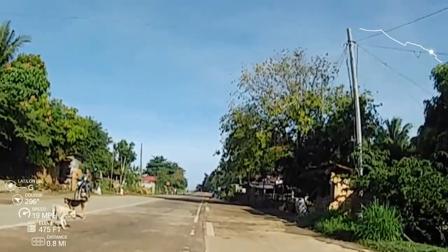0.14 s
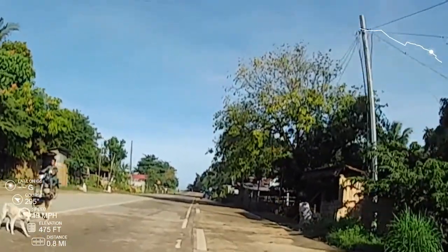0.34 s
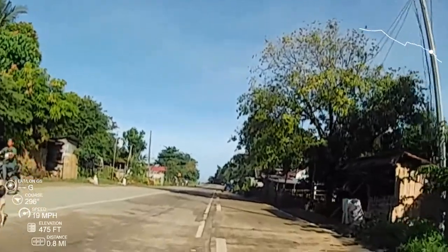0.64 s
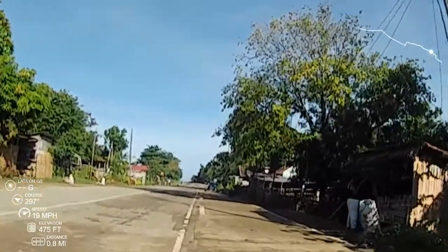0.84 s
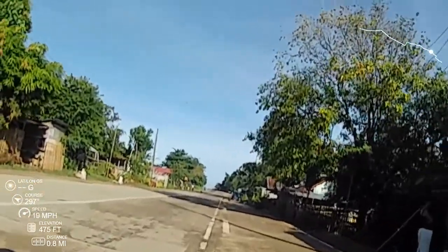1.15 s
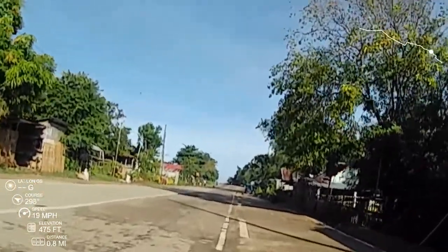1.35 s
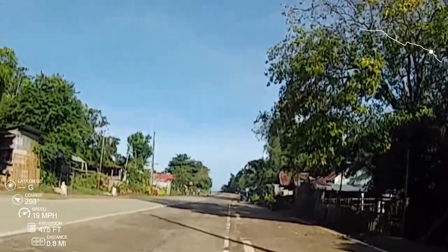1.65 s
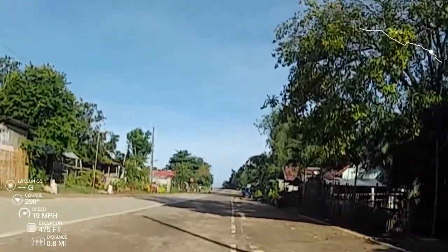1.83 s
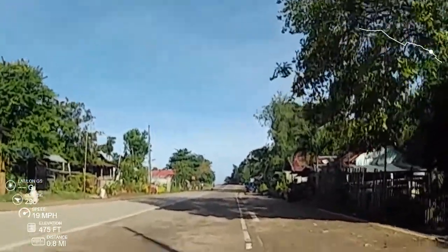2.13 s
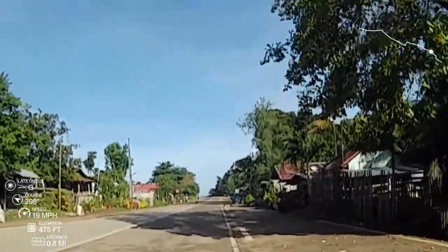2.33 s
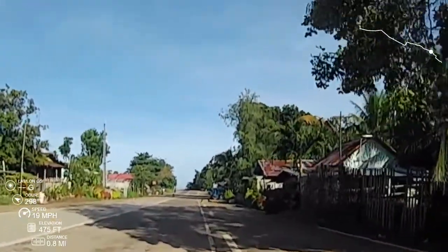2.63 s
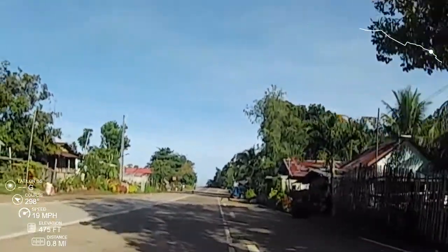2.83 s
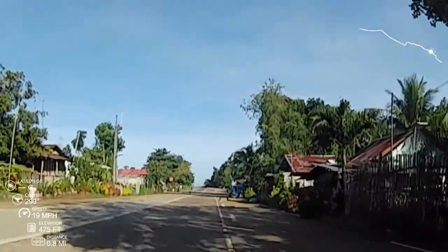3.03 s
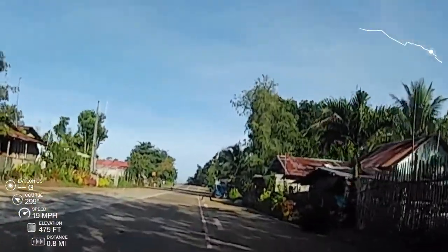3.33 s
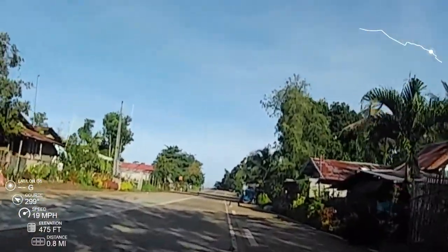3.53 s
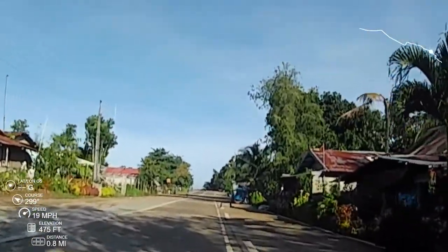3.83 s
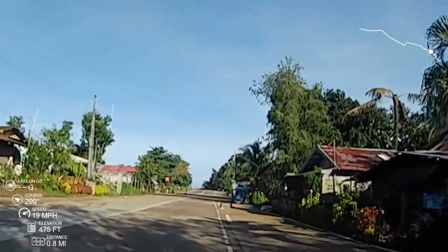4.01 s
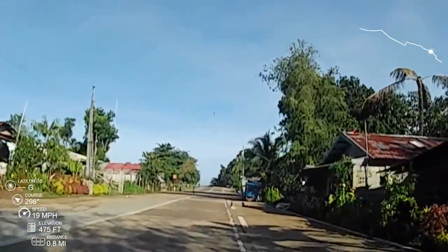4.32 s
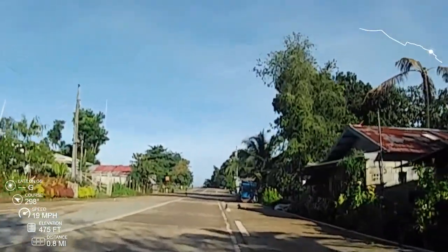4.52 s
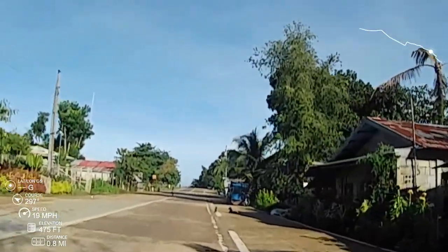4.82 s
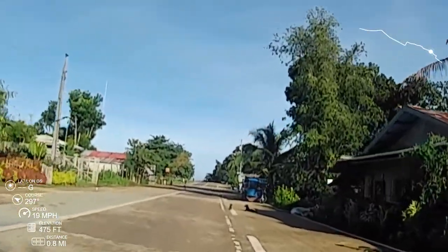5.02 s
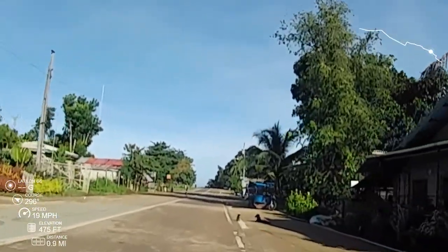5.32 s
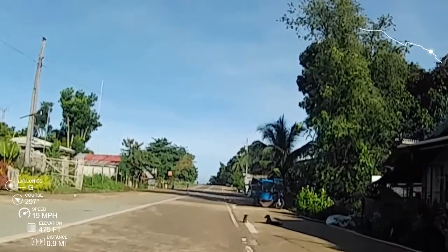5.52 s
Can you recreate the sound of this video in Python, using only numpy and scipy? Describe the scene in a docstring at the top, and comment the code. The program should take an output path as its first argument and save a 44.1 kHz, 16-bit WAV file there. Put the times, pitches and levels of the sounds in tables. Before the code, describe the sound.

A bicycle rolls along a paved country road, heard from a microphone close to the handlebar bell. The bell is still ringing faintly when it is struck once with a shrill clang that briefly distorts, then rings on with a fast shimmer for several seconds. Wind thumps, hisses and whistles unsteadily on the microphone, growing gustier later, while the tyres rush softly and flick up a little grit.

```python
"""Bicycle bell on a country road

A paved country road, heard from a camera microphone riding on the bicycle, close to the bell.
Air buffets the microphone, hisses and whistles unsteadily over the housing; the tyres rush and flick
a little grit. The bell, still ringing from an earlier ding, is struck again: a shrill clang overloads
the microphone, then the dome rings out, beating."""
import sys
import numpy as np
from scipy import signal
from scipy.fft import rfft, irfft
from scipy.io import wavfile

SR = 44100
rng = np.random.default_rng(int(sys.argv[2]) if len(sys.argv) > 2 else 0)


def int16_out(signal):
    """Quantize to a 16-bit WAV file."""
    q = np.round(np.clip(np.atleast_2d(signal).T, -1, 1) * 32767)
    wavfile.write(sys.argv[1], SR, q.astype(np.int16))


N = 249606
TIME = np.arange(N) / SR
BIN_HZ = np.arange(N // 2 + 1) * SR / N


def from_db(db):
    """Decibels to gain."""
    return 10 ** (np.asarray(db) / 20)


def unit_rms(x):
    """Scale to unit rms."""
    return x / np.sqrt(np.mean(x ** 2) + 1e-20)


def curves(rows):
    """Join rows (t/s, values..) with straight lines, one curve for each column of values."""
    times, *columns = np.transpose(rows)
    return [np.interp(TIME, times, column) for column in columns]


def swells(rows):
    """Each row (t/s, length/s, heights..) is a smooth hump; one sum for each column of heights."""
    return sum(np.outer(heights, .5 ** np.minimum((2 * (TIME - centre) / length) ** 2, 20))
               for centre, length, *heights in rows)


def drift(rate_hz):
    """Random wander of unit rms, mostly slower than rate_hz."""
    return unit_rms(irfft(rfft(rng.standard_normal(N)) / (1 + (BIN_HZ / rate_hz) ** 2), N))


def flicker(rate_hz):
    """Random wander of unit rms without extreme peaks."""
    return unit_rms(np.tanh(drift(rate_hz) / 1.5))


def noise(colour):
    """Noise of unit rms with the spectrum (f/Hz, level/dB), rolled off beyond both ends."""
    hz, level_db = np.transpose(colour)
    bins = np.maximum(BIN_HZ, 1)
    gain = from_db(np.interp(np.log(bins), np.log(hz), level_db))
    roll_off = 1 / (1 + (bins / hz[-1]) ** 8) / (1 + (hz[0] / bins) ** 4)
    return unit_rms(irfft(rfft(rng.standard_normal(N)) * gain * roll_off, N))


def patchy_noise(colour, depth_db):
    """Coloured noise of unit rms whose treble bands each flicker on their own."""
    centres_hz = np.geomspace(1500, 9500, num=9)
    spectrum, out = rfft(noise(colour)), 0
    for share in np.eye(len(centres_hz)):
        band = irfft(spectrum * np.interp(BIN_HZ, centres_hz, share), N)
        out = out + band * from_db(depth_db * flicker(24))
    return unit_rms(out)


# thumb strikes: t/s, level/dB, change of the lowest tone with the striking point/dB
BELL_STRIKES = [(-.85, -2, -4.5), (.7528, 0, 0)]
# ringing tones of the bell, the lowest two a beating pair; 12327 Hz is distortion from the microphone:
# f/Hz, level/dB, t60/s, boost during the clang/dB
BELL_TONES = [(3196, -20.6, 9.2, 6.8), (3241, -17, 9.7, 3.2), (4526, -42, 2.6, 25), (6391, -60.5, 3.8, 0),
              (7095, -68, 9, 0), (7144, -65, 8, 44), (8005, -80, .6, 58), (8425.5, -16.3, 3.05, 20.3),
              (11016, -86, 6, 63), (12327, -45.5, 2.9, 15), (14940, -69, 5.5, 0), (15210, -76, 4, 0)]
# the clang throbs as the low pair beats, and ends with a click:
# t/s, length/s, boost of the lower tones/dB, boost of the rasp/dB
CLANG_THROBS = [(.7905, 0.0091, 6.5, 3), (.814, 0.0089, -1, 2.5), (.874, .003, 0.5, -0.5)]
# spectrum of the click and the clang's harsh rasp: f/Hz, level/dB
RASP_COLOUR = [(40, -12), (300, -14), (1500, -18.5), (3500, -9.5), (6000, -6.5), (8300, 4), (10500, -1.5),
               (13000, -28.5), (16000, -29.5)]


def bell(clang_s=.1222, first_beat_s=.0152, shimmer_db=.8, shake_rad=.04, lower_tones_hz=5000):
    """On the handlebar, close by: each strike clicks and clangs, then the trembling dome rings freely."""
    out = np.zeros(N)
    rasp_noise = noise(RASP_COLOUR)
    throb_db, rasp_boost_db = swells(CLANG_THROBS)
    # the higher the tone, the more its strength and phase tremble
    trembles = [hz / BELL_TONES[-1][0] * np.array([shimmer_db * drift(16), shake_rad * drift(70)])
                for hz, *_ in BELL_TONES]
    for start, strength_db, lowest_db in BELL_STRIKES:
        age = np.maximum(TIME - start, 0)
        clang = np.clip((clang_s - age) / .001, 0, 1)
        # the ring falls faster while it is loudest, and again as it dies out
        fade_db = 2.5 * np.exp(-age) - 5 * np.maximum(age - 3.6, 0)
        ring = 0
        for k, (hz, db, t60, boost_db) in enumerate(BELL_TONES):
            tremble_db, tremble_rad = trembles[k]
            free_db = db + lowest_db * (k == 0) + fade_db + tremble_db - 60 * age / t60
            clang_db = clang * (boost_db + throb_db * (hz < lower_tones_hz))
            phase = 2 * np.pi * hz * (age - first_beat_s) + tremble_rad
            ring = ring + np.sqrt(2) * np.sin(phase) * from_db(free_db + clang_db)
        rasp = clang * from_db(-4.5 + rasp_boost_db)
        click = from_db(9) * np.exp(-age / .0015)
        out += from_db(strength_db) * (age > 0) * (ring + (rasp + click) * rasp_noise)
    return out


# eddies that hit the microphone squarely: t/s, length/s, boost of the thumps/dB, boost of the rumble/dB
EDDY_BLOWS = [(.38, 0.19, 4, 6), (.6, 0.086, 4.5, 3), (.9, 0.043, 8, 0), (1.05, 0.21, 1, 8),
              (1.24, 0.13, 4.5, 5.5), (1.425, 0.059, 11, -0.5), (2.06, 0.055, 7, 0.5), (3.27, 0.15, -1, 6),
              (3.39, 0.22, 6, 1.5), (4.08, 0.058, 5.5, -0.5), (4.48, 0.071, 4.5, 2.5),
              (4.88, 0.088, 4, 4.5), (5.16, 0.059, 6.5, 1.5)]
# spectra of the deep thumps and of the rumble above them: f/Hz, level/dB
THUMP_COLOUR = [(8, -18), (20, 2.5), (32, 0.5), (60, -3), (100, -9), (170, -26), (400, -60.5)]
RUMBLE_COLOUR = [(50, -11.5), (115, 0), (180, -2.5), (300, -6.5), (450, -12.5), (900, -32)]


def buffeting(flow_db, eddies):
    """Turbulent air thumps and rumbles right on the microphone, harder at each blow."""
    thump_boost_db, rumble_boost_db = swells(EDDY_BLOWS)
    thumps = unit_rms(np.tanh(noise(THUMP_COLOUR) / 2))   # the pressure of a gust is bounded
    thump_db = -24 + thump_boost_db + .16 * flow_db + 1.3 * drift(8)
    rumble_db = -25.5 + rumble_boost_db + .69 * flow_db + .52 * eddies
    return from_db(thump_db) * thumps + from_db(rumble_db) * noise(RUMBLE_COLOUR)


# spectra of the air's rush in the port and of its hiss: f/Hz, level/dB
RUSH_COLOUR = [(250, -7.5), (450, -6.5), (600, 0), (780, -8.5), (1000, -8), (1700, -14), (4000, -61)]
HISS_COLOUR = [(2000, -25.5), (3300, -1.5), (4000, 3.5), (4700, -3), (5300, -8), (6200, -25), (9000, -32),
               (10500, -44), (16000, -62)]


def wind(flow_db, treble_db, gust_db, eddies):
    """The air rushes in the microphone's port and hisses, swelling with each gust and eddy."""
    puffs = .5 * eddies + .57 * flicker(76)   # small eddies ride on the large ones
    rush_db = -29 + .92 * flow_db + .31 * gust_db + 5.5 * puffs
    hiss_db = -43 + 1.23 * treble_db + .99 * gust_db + 1.2 * eddies + 3 * flicker(57)
    rush = from_db(rush_db) * noise(RUSH_COLOUR)
    return rush + from_db(hiss_db) * patchy_noise(HISS_COLOUR, depth_db=2.5)


def whistle(flow_db, gust_db, gust_speed, eddies, cruise_hz=1077.6, chirps_per_s=32,
            unrest=.6, width_hz=55, blur_hz=190):
    """Vortices shed from the housing chirp at a pitch that follows the air speed, purer in gusts."""
    speed = 1 + gust_speed
    purity = np.clip(.62 + 2.2 * gust_db, .02, .92)
    unsteady = from_db(-np.maximum(gust_db, 0))   # a strong gust overrides the eddies
    # each chirp is an arch, rising and falling in pitch and strength together
    chirp_rate = chirps_per_s * np.exp(.35 * flicker(20.09))
    arches = np.abs(np.sin(np.pi * np.cumsum(chirp_rate) / SR))
    arches = unit_rms(arches - arches.mean())
    pitch_hz = cruise_hz * speed * (1 + unsteady * (.035 * eddies + .05 * arches))
    phase = 2 * np.pi * np.cumsum(pitch_hz) / SR
    # regular shedding gives a tone shaken in strength and phase, reedier in the fastest air
    shaken = phase + unrest * drift(width_hz)
    reediness = purity * (speed / speed.max()) ** 2
    overtones = from_db(-15) * np.sin(2 * shaken) + from_db(-20) * np.sin(3 * shaken)
    tone = np.sin(shaken) + reediness * overtones
    tone = unit_rms(tone * (1 + unrest * unsteady * flicker(width_hz)))
    # irregular shedding blurs it into a band of noise
    blur = unit_rms(drift(blur_hz) * np.sin(phase) + drift(blur_hz) * np.cos(phase))
    level_db = -25 + .95 * flow_db + gust_db + 2 * unsteady * arches
    return from_db(level_db) * (np.sqrt(purity) * tone + np.sqrt(1 - purity) * blur)


# flares of the road rush, and brief dips (negative) where the air lulls: t/s, length/s, boost/dB
ROAD_FLARES = [(.49, 0.081, 5), (2.33, 0.065, 6), (2.591, 0.0056, 14.5), (2.715, 0.023, 8.5),
               (3.21, 0.066, -9.5), (3.78, 0.021, 8), (3.832, 0.0077, 15), (4.203, .016, -1),
               (4.23, 0.039, 7), (5.16, 0.055, 5.5), (5.237, .012, -3.5)]
# spectrum of the tread on the road: f/Hz, level/dB
TYRE_COLOUR = [(500, -21.5), (1000, 1), (1500, 2), (2000, -2), (2650, -3.5), (3200, -10.5), (4200, -32.5),
               (7000, -55.5)]


def tyres(treble_db):
    """Below the microphone, tread on coarse paving: a grainy rush that briefly flares and dips."""
    flare_db, = swells(ROAD_FLARES)
    grain_db = 1.5 * flicker(98) + flicker(9)
    return from_db(-33 + treble_db + flare_db + grain_db) * patchy_noise(TYRE_COLOUR, depth_db=2.1)


# grit hitting the frame: t/s, level/dB, f/Hz, overtone relative to the ring/dB
GRIT_HITS = [(.208, -57, 9600, -21), (2.153, -54, 9250, -25), (2.447, -48, 6200, -30),
             (4.423, -46, 8700, -1), (4.4385, -38, 8750, -2), (4.4503, -47, 8750, -4),
             (4.850, -53, 8300, -22), (4.8588, -47, 7400, -24), (4.8685, -41, 7250, -25),
             (4.869, -49, 8700, -14), (4.8765, -49, 8450, -20), (4.889, -48, 7600, -25)]


def grit(tick_s=.0037, ring_s=.006, overtone_ratio=1.72):
    """Small stones chink on the frame: a narrow-band tick and a short metallic ring with an overtone."""
    out, white = np.zeros(N), rng.standard_normal(N)
    for start, db, hz, overtone_db in GRIT_HITS:
        age = np.maximum(TIME - start, 0)
        band = signal.butter(2, [hz * .95, hz * 1.05], "band", fs=SR, output="sos")
        tick = unit_rms(signal.sosfilt(band, white)) * np.exp(-age / tick_s)
        phase = 2 * np.pi * hz * age
        ring = np.sin(phase) + from_db(overtone_db) * np.sin(overtone_ratio * phase)
        attack = np.minimum(age / .0005, 1)
        out += from_db(db) * attack * (tick + from_db(-9) * ring * np.exp(-age / ring_s))
    return out


# sudden slaps of air on the microphone: t/s, level/dB, f/Hz
AIR_SLAPS = [(3.332, -15, 1107), (4.2123, -12.5, 1210), (4.2918, -15.5, 1110), (5.066, -18, 1005),
             (5.2432, -13.5, 1067), (5.272, -15, 1144), (5.486, -13.5, 1344)]


def slaps(rise_s=.0033):
    """Each slap of air sets the microphone's port ringing for a few cycles, with a breathy edge."""
    out, breath = np.zeros(N), .14 * noise(TYRE_COLOUR)
    for start, db, hz in AIR_SLAPS:
        age = np.maximum(TIME - start, 0)
        envelope = age / rise_s * np.exp(1 - age / rise_s)
        out += from_db(db) * envelope * (np.sin(2 * np.pi * hz * age) + breath)
    return out


# air stream and treble (hiss and tyres) relative to cruising; both sink after the clang and creep back:
# t/s, air level/dB, treble level/dB
AIR_FLOW = [(0.0, -4.5, -7.5), (0.2, -4.5, -7), (0.55, -1.5, -3), (0.74, -3, -3.5), (0.95, -16.5, -12.5),
            (1.25, -16.5, -16.5), (1.55, -9.5, -10), (1.9, -5.5, -5), (2.45, -5, -3.5), (2.62, -2.5, -2.5),
            (2.88, -4.5, -8), (3.03, 0.5, -0.5), (3.62, -2.5, -3), (3.85, 3, 1.5), (4.35, 0, -1),
            (5.05, 0.5, -2.5), (5.25, 0.5, 0.5), (5.66, 0.5, 1)]
# gusts over the housing, and lulls (negative): t/s, length/s, change of air speed/fraction, swell/dB
AIR_GUSTS = [(.03, 0.0291, -.05, 2.5), (.068, .028, .17, 4), (.125, .05, -.18, -0.5), (.2, 0.0306, .13, 7),
             (.232, 0.0249, .08, 10), (.29, .06, -.1, -13), (.357, .03, .25, 5.5), (.45, 0.0205, .12, 1.5),
             (.492, .04, .23, 6), (.55, .025, 0.2, 3), (.602, 0.02487, .14, 1.5), (.66, 0.02986, -.05, 4),
             (.72, 0.04056, -.09, 5), (.883, .025, 0.15, 9.5), (1.022, .022, 0.35, 10),
             (1.305, .032, .25, 8), (1.382, .025, .23, 8), (1.5, 0.0298, .07, 3.5), (1.7, .04, .12, 0),
             (1.765, .04, .18, 1.5), (1.85, .05, .11, 4), (1.98, .07, 0.16, 0), (2.04, 0.037, 0, -5.5),
             (2.07, 0.01963, .13, -1), (2.565, .035, .2, 2), (2.63, .04, .16, 2), (2.71, .06, .2, 2),
             (2.775, .025, 0.12, 2), (2.808, .025, 0, -10.5), (2.835, 0.02016, .15, 2.5),
             (3.08, 0.02027, .15, 1), (3.135, .06, .18, 2.5), (3.21, .05, -.08, -9.5),
             (3.295, .025, 0.29, 1.5), (3.32, .02, 0, -7.5), (3.36, .025, .2, 1), (3.39, .025, 0.21, 4),
             (3.437, .055, .31, 6.5), (3.49, 0.0197, .1, 5), (3.535, .03, .17, 2.5), (3.63, 0.051, 0, -1.5),
             (3.78, 0.013, -.08, 5.5), (3.995, .05, .22, 0), (4.13, .03, .12, 1.5), (4.185, .025, .12, 1.5),
             (4.205, 0.0096, 0, -7), (4.275, 0.023, -0.068, -6.5), (4.51, .04, .18, 0),
             (4.575, 0.055, .15, 3.5), (4.635, .03, -.02, -3), (4.675, .034, .3, 4), (4.702, .018, .18, 4),
             (4.758, .04, .32, 2), (4.83, 0.039, 0.25, 8), (4.88, .03, .16, -1), (4.922, .022, .18, 4.5),
             (4.955, 0.027, -.03, -7), (4.987, .02, 0, 2), (5.022, 0.029, .19, 1), (5.055, 0.017, 0, -11.5),
             (5.11, 0.0498, -.05, 1.5), (5.238, .012, 0, -7), (5.263, .016, 0, -2.5), (5.293, .008, 0, 5),
             (5.315, .025, .14, 2), (5.405, 0.027, 0.16, 2.5), (5.447, 0.043, .24, 3), (5.481, .012, 0, -6),
             (5.535, .03, 0.17, 3.5), (5.57, .035, .19, 0.5), (5.63, .04, .13, 2.5)]


def scene():
    """The ride in mono at the microphone; one air stream drives the buffeting, wind and whistle."""
    eddies = flicker(22)
    flow_db, treble_db = curves(AIR_FLOW)
    gust_speed, gust_db = swells(AIR_GUSTS)
    air = buffeting(flow_db, eddies) + wind(flow_db, treble_db, gust_db, eddies)
    air += whistle(flow_db, gust_db, gust_speed, eddies)
    return (bell() + air + slaps() + tyres(treble_db) + grit())[None]


# spectrum of the overdriven microphone's harsh fizz: f/Hz, level/dB
FIZZ_COLOUR = [(40, 5.5), (1400, -8), (1950, -0.5), (2600, -15), (4500, -5), (6000, 0), (8300, 1.5),
               (10000, 4.5), (12500, -7), (16000, -12)]


def record(dry, ceiling=.65, fizz_db=-19, release_s=.007, dull_hz=12500, cutoff_hz=15700):
    """The microphone clips at its ceiling and fizzes when driven far beyond; the top is dulled and cut."""
    oversampled = signal.resample_poly(dry, 4, 1, axis=1)
    clipped = signal.resample_poly(np.clip(oversampled, -ceiling, ceiling), 1, 4, axis=1)
    hold = np.exp(-1 / (release_s * SR))
    overdriven = signal.lfilter([1 - hold], [1, -hold], (np.abs(dry) > 2 * ceiling) + 1e-18)
    fizz = from_db(fizz_db) * overdriven * noise(FIZZ_COLOUR)
    dulled = signal.sosfilt(signal.butter(2, dull_hz, fs=SR, output="sos"), clipped + fizz)
    return signal.sosfilt(signal.ellip(10, .1, 80, cutoff_hz, fs=SR, output="sos"), dulled)


dry = scene()
out = record(dry)
int16_out(out)
```